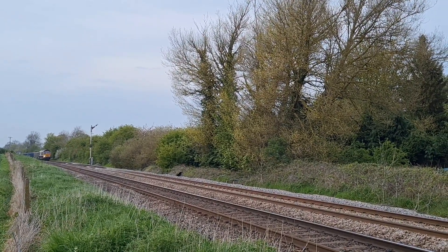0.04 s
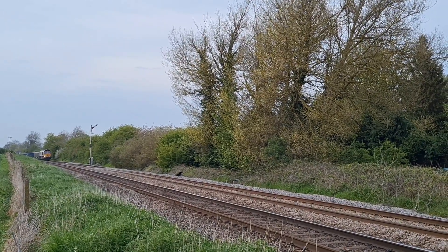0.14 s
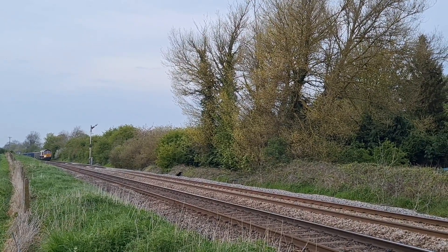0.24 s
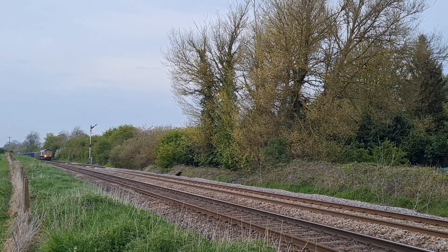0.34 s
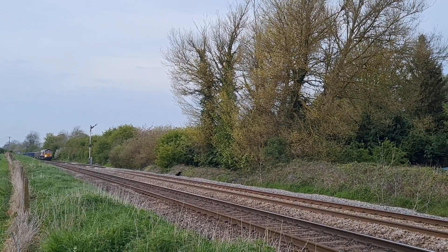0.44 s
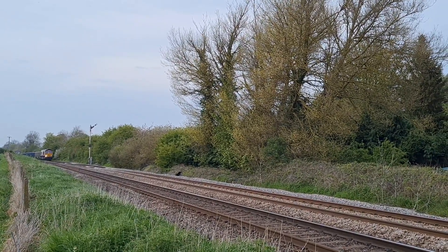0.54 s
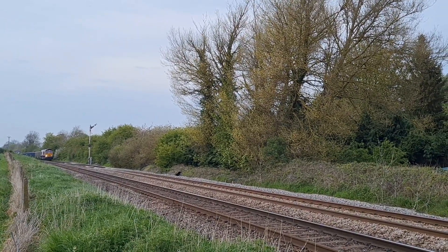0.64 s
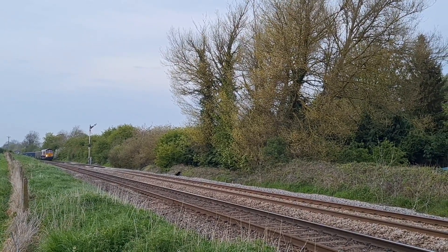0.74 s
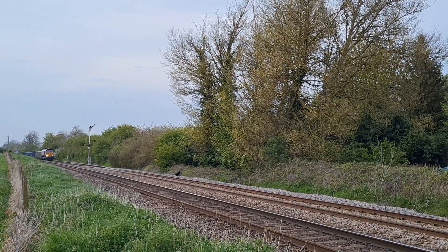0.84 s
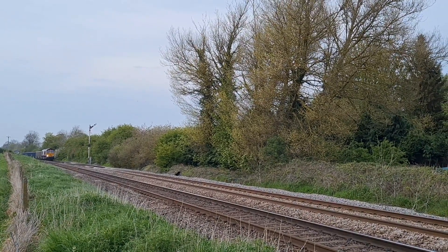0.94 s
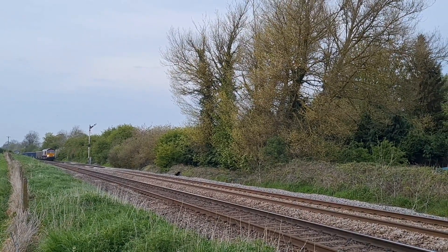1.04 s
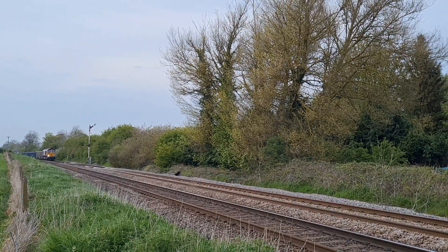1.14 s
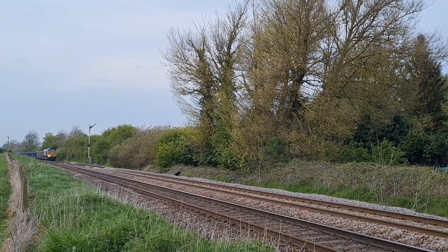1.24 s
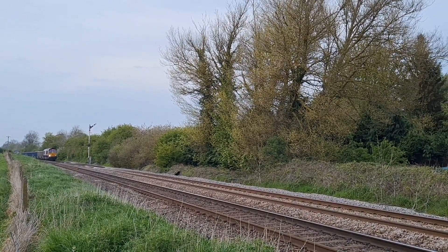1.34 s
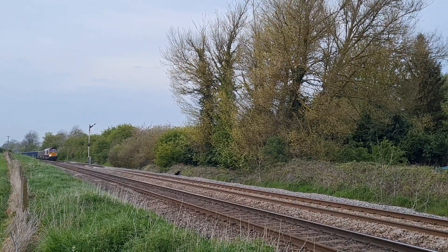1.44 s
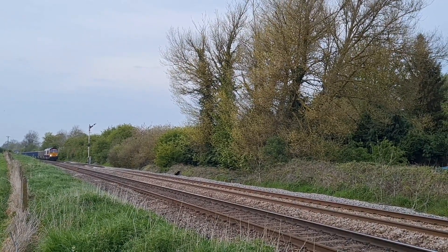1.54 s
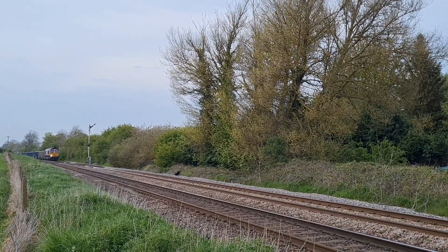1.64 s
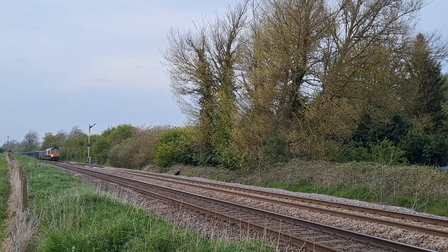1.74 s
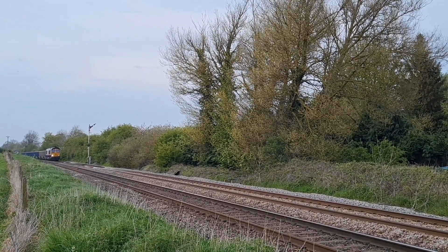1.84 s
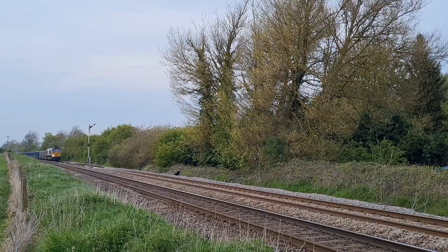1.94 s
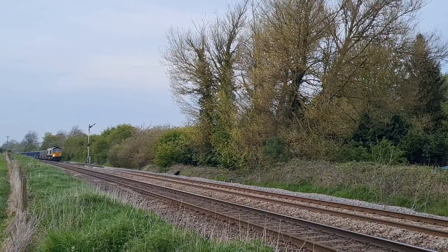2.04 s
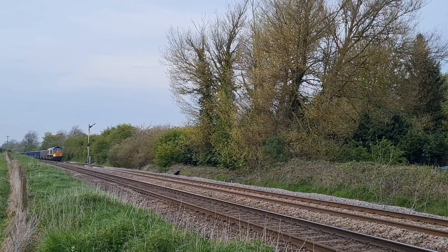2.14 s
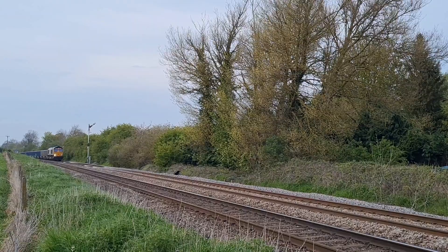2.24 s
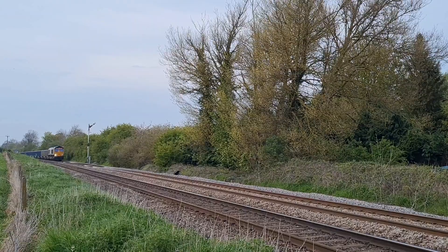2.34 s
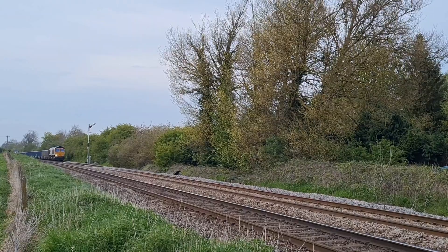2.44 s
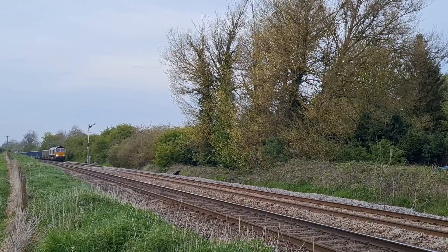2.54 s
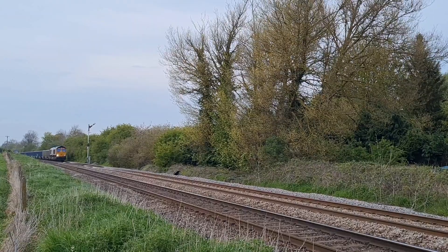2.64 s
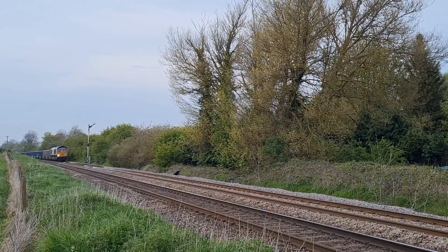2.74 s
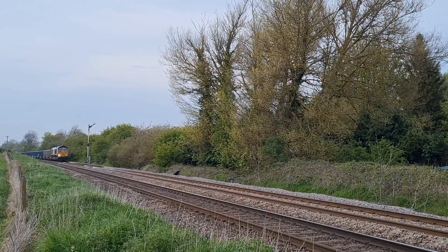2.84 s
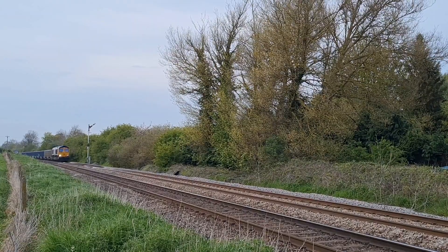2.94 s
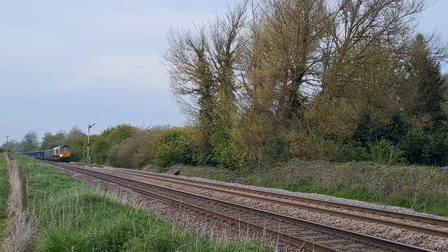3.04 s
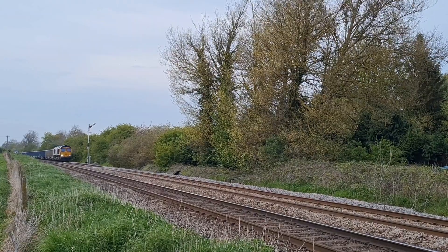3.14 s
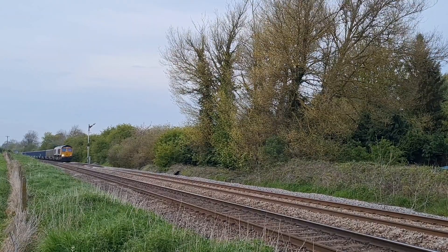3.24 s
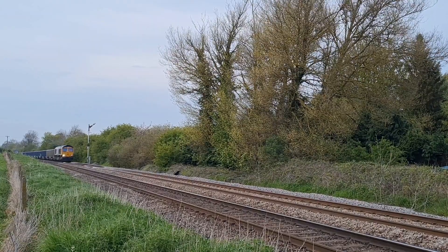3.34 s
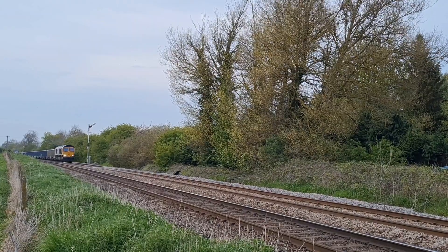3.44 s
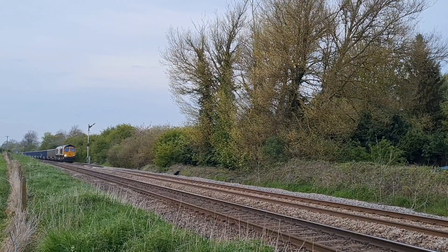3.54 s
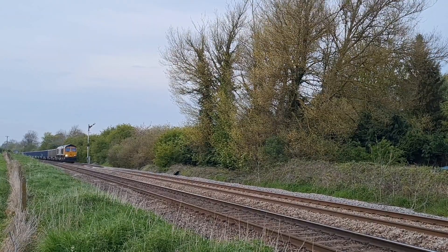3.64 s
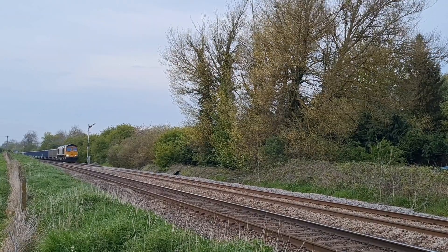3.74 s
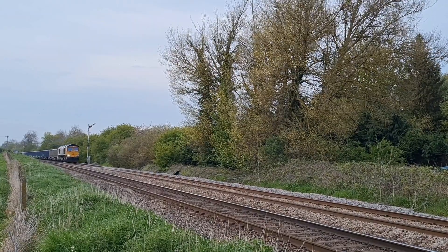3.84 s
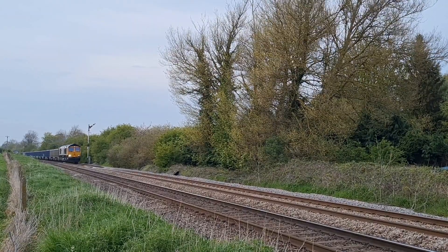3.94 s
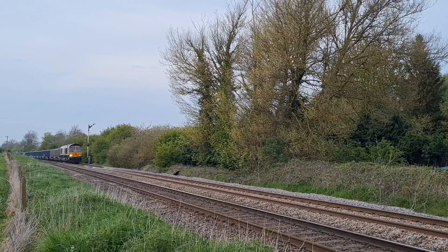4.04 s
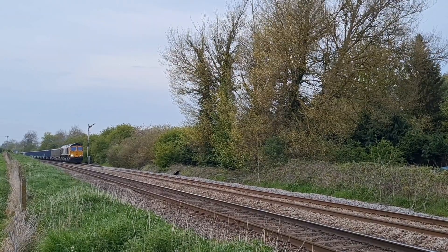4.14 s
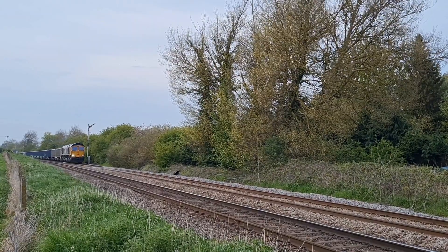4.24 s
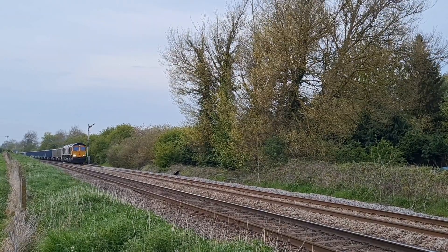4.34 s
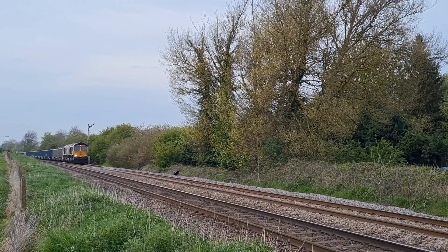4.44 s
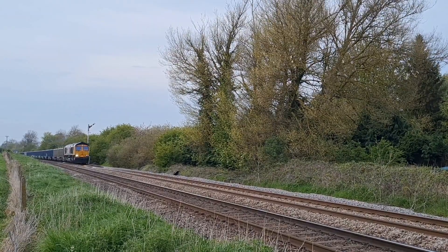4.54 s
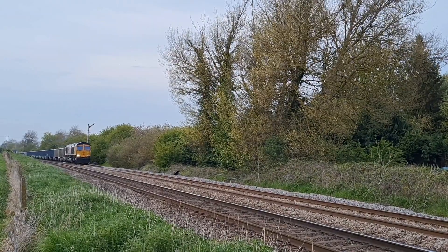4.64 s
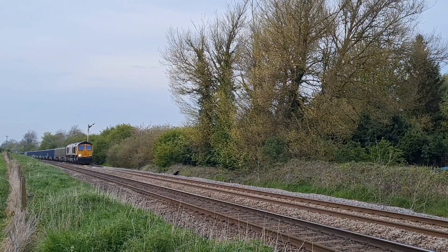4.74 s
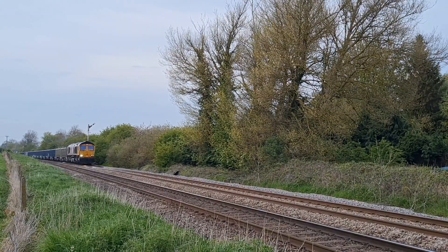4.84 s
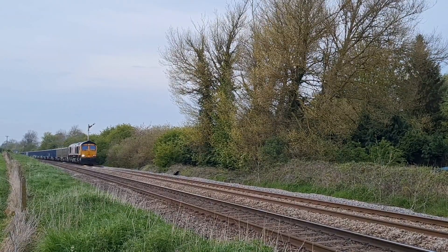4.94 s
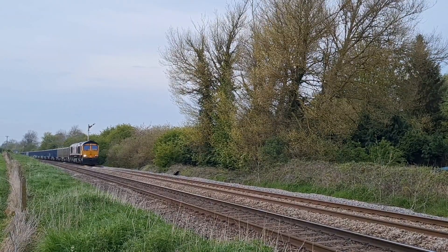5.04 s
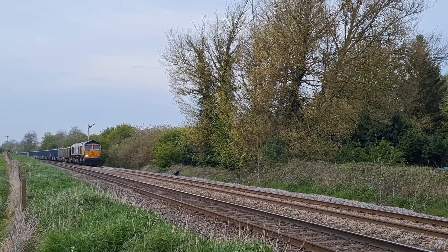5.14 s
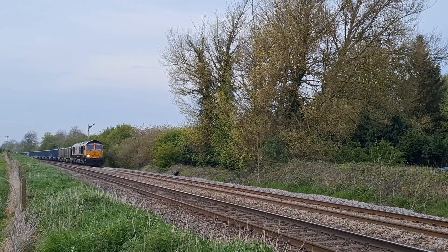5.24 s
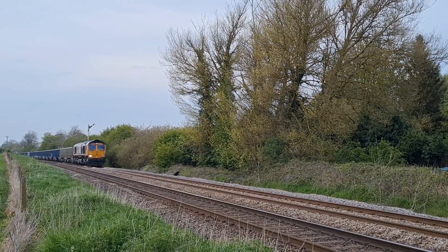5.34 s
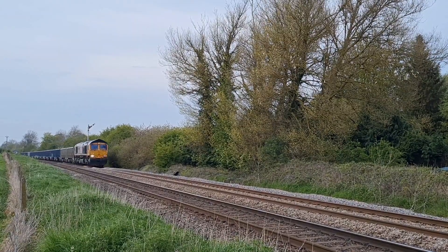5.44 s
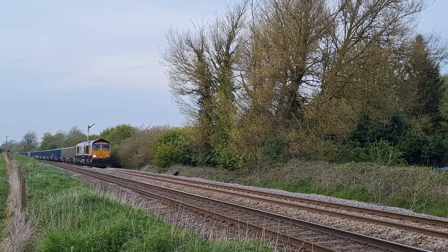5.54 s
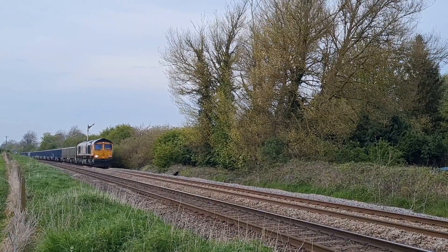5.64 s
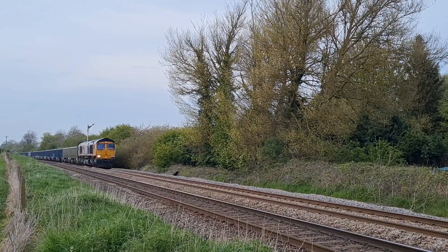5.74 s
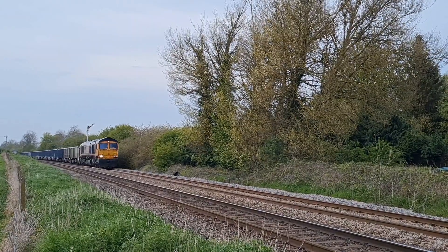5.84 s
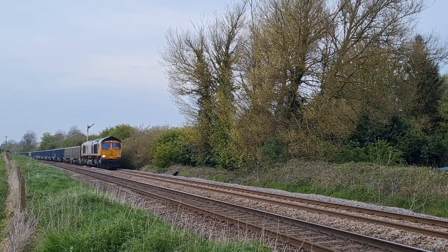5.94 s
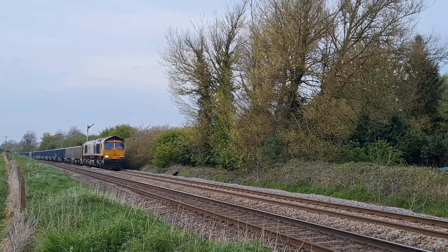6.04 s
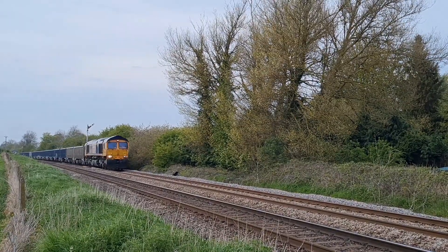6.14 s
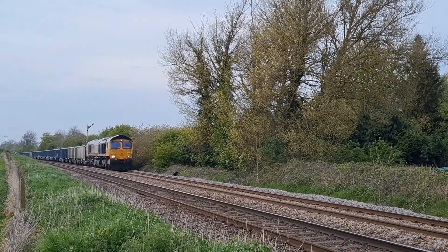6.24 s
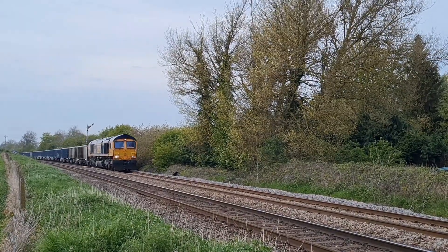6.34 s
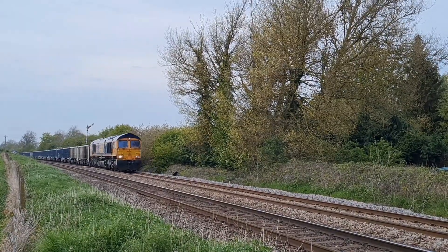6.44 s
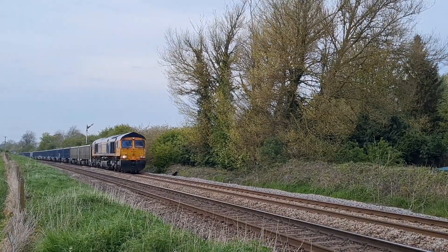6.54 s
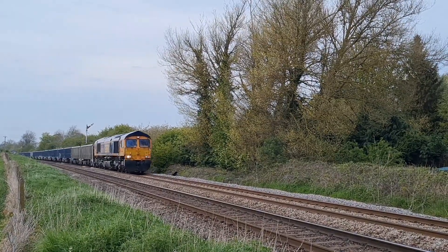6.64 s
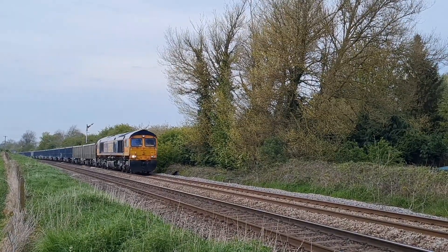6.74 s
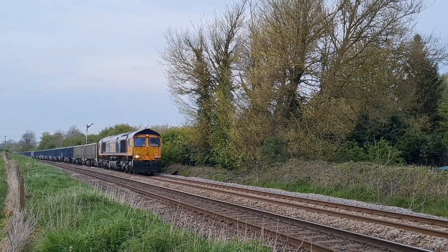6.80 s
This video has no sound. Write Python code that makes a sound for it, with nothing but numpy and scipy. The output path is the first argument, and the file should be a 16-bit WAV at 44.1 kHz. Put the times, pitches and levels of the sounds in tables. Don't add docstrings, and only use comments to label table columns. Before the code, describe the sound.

Low engine rumble and rolling steel grow steadily nearer across open country until a locomotive's air horn barks twice, brassy and close in pitch.

```python
import sys
import numpy as np
from scipy import signal
from scipy.io import wavfile
from scipy.ndimage import uniform_filter1d, minimum_filter1d

SR = 44100
rng = np.random.default_rng(int(sys.argv[2]) if len(sys.argv) > 2 else 0)


def put_to_file(sound):
    columns = np.atleast_2d(sound).T
    safe = np.clip(columns, -1, 1)
    whole_steps = np.round(safe * 32767)
    wavfile.write(sys.argv[1], SR, whole_steps.astype(np.int16))


def attenuation_scalar(level_db):
    decades = np.asarray(level_db, float) / 20
    return 10 ** decades


N = 302967


def read(points, hz):
    f, value = np.transpose(points)
    return np.interp(np.log(hz + 1), np.log(f + 1), value)


def evened(x):
    return x / np.sqrt(np.mean(abs(x) ** 2) + 1e-20)


def drift(rate_hz, n):
    t = np.arange(0, n + 256, 256) / SR
    f = np.geomspace(rate_hz / 12, rate_hz, 16)[:, None]
    sines = np.sin(2 * np.pi * (f * t + rng.random(f.shape)))
    slow = (sines / np.sqrt(f)).sum(0)
    return np.interp(np.arange(n) / SR, t, evened(slow))


# f/Hz, left minus right level/dB
PORT_LEAN = [(60, -2), (220, -1), (380, -5), (520, 2.7), (900, -2), (1450, 4), (1800, 1), (2200, 5.74),
             (3400, -6), (3800, -1), (4800, -12), (7000, 1), (9500, 3), (10500, 18), (13500, 9),
             (14800, 18)]
# f/Hz, left lead/rad
PORT_LEAD = [(30, .45), (330, 0), (500, -.4), (800, -.7), (1550, -4), (1980, -3.5), (2410, 1.4), (2930, 2),
             (3450, 7.3), (3900, 7.7), (4600, 9.5), (5300, 7), (6500, 15), (14600, 30)]


def ports(hz):
    half = attenuation_scalar(read(PORT_LEAN, hz) / 2) * np.exp(.5j * read(PORT_LEAD, hz))
    return np.array([half, 1 / half])


# f/Hz, likeness/0-1
PORT_LIKENESS = [(60, .99), (300, .93), (470, .3), (650, .88), (1000, .6), (1500, .85), (4200, .85),
                 (4700, .4), (5500, .6), (8000, .3), (14000, .2)]


def noise(shape_db, size, patchy_db, gust_db, count=N):
    frames, hz = 2 * count // size + 3, np.fft.rfftfreq(size, 1 / SR)
    a, b, c, d, patches = rng.standard_normal((frames, len(hz), 5), np.float32).T
    patches = evened(uniform_filter1d(uniform_filter1d(patches, 8, 0), 6, 1))
    gusts = evened(uniform_filter1d(rng.standard_normal(frames), 6))
    same = np.clip(read(PORT_LIKENESS, hz), 0, 1)[:, None]
    left = a + 1j * b
    right = same * left + np.sqrt(1 - same ** 2) * (c + 1j * d)
    z = np.array([left, right]) * ports(hz)[:, :, None]
    z *= attenuation_scalar(shape_db(hz)[:, None] + patchy_db * patches + gust_db * gusts)
    out = signal.istft(z, window="cosine", nperseg=size, noverlap=size // 2)[1][:, :count]
    return out / np.sqrt(np.mean(out.mean(0) ** 2))


def orders(hz, table, waver_db, slip):
    t, out = np.arange(N) / SR, np.zeros((2, N))
    for k, db in table:
        turn = 2 * np.pi * (k * hz * t + rng.random()) + slip * drift(5., N)
        line = np.sqrt(2) * attenuation_scalar(db + waver_db * drift(6., N)) * np.exp(1j * turn)
        out += (ports(k * hz)[:, None] * line).real
    return out


# f/Hz, level/dB per Hz
FIELD_WASH = [(90, -27), (150, -14.5), (260, 1.5), (330, -6), (520, -14.5), (900, -16), (1500, -49)]


def field():
    return attenuation_scalar(-55) * noise(lambda hz: read(FIELD_WASH, hz), size=1024, patchy_db=-1.0, gust_db=2.0)


# f/Hz, level/dB per Hz
SIZZLE = [(5000, -25), (6300, 5), (7300, 1.5), (7800, -8.5), (8200, -25.5), (8700, -12), (9800, -5.5),
          (10200, -8), (11900, -4.5), (13000, -6.5), (14100, -5), (14800, -10), (15200, -37)]


def sizzle():
    return attenuation_scalar(2.0) * noise(lambda hz: read(SIZZLE, hz), size=512, patchy_db=1.1, gust_db=0.0)


# f/Hz, level/dB per Hz
TRAIN_HISS = [(800, -15.5), (1250, -3), (1500, -1), (1650, 0.5), (1900, 0.5), (2150, -5), (2400, -5),
              (2650, -6.5), (3000, -5), (3400, -10), (3620, -13.5), (4300, -11.5), (5900, -19.5),
              (7500, -33), (8200, -58)]


def hiss():
    return attenuation_scalar(1.0) * noise(lambda hz: read(TRAIN_HISS, hz), size=512, patchy_db=0.82, gust_db=0.48)


# f/Hz, width/Hz, level/dB over the roar
WHEEL_RINGS = [(365.4, 13, -20.5), (689, 59, -17), (735, 9.2, -6), (843.6, 54, -5)]


def wheel_rings(hz):
    peaks = 0
    for f, width, db in WHEEL_RINGS:
        peaks = peaks + attenuation_scalar(2 * db) / width / (1 + (2 * (hz - f) / width) ** 2) ** 2
    return 10 * np.log10(peaks)


# f/Hz, level/dB per Hz
RAIL_ROAR = [(100, -51), (170, -14.5), (216, -17.5), (276, -8), (312, -12.5), (373, -2), (437, -38),
             (490, -29), (564, -11), (762, 0), (925, -9.5), (1130, -5.5), (1400, -16), (1820, -33),
             (3080, -120)]
# multiple, level/dB over the roar
GENERATOR = [(2, -16.5), (3, -21), (4, -15.5), (5, -27.5), (6, -22), (8, -9.5), (12, -10)]
HUM_HZ = 95.24


def rolling():
    out = attenuation_scalar(-1.5) * noise(lambda hz: read(RAIL_ROAR, hz), size=1024, patchy_db=1.2, gust_db=.3)
    out += orders(HUM_HZ, GENERATOR, waver_db=3.0, slip=0.41)
    return out + attenuation_scalar(-7.5) * noise(wheel_rings, size=8192, patchy_db=3, gust_db=.6)


# multiple, level/dB over the exhaust
CRANK_ORDERS = [(3, -16), (4, -13.5), (5, -9.5), (6, -13.5), (7, -20), (8, -23), (9, -24.5), (10, -29),
                (14, -42.5), (20, -40.5)]
CRANK_HZ = 16.13


def crank():
    return orders(CRANK_HZ, CRANK_ORDERS, waver_db=3.0, slip=0.85)


def boom(hz, width_hz):
    turn = np.exp(2j * np.pi * np.cumsum(hz) / SR)
    r = np.exp(-np.pi * width_hz / SR)
    slow = signal.lfilter([1], [1, -2 * r, r * r], rng.standard_normal((N, 2)) @ [1, 1j])
    steady = slow / (abs(evened(slow)) + .05) ** .6
    return (ports(55.)[:, None] * np.sqrt(2) * evened(steady) * turn).real


# f/Hz, level/dB per Hz
EXHAUST = [(12, -50), (22, -16), (35, -11), (48, 1.5), (65, -1.5), (90, -26.5), (120, -20.5), (170, -42.5),
           (260, -34), (400, -91)]
BOOM_MID_HZ, BOOM_WANDER_HZ = 55.5, 3.1


def throb():
    rough = attenuation_scalar(-4.2) * noise(lambda hz: read(EXHAUST, hz), size=4096, patchy_db=-1.0, gust_db=0.9)
    return rough + attenuation_scalar(-3.5) * boom(BOOM_MID_HZ + BOOM_WANDER_HZ * drift(4., N), 7.4)


# level/dB at 100 m, loss/dB per 100 m, level/dB hidden by the bushes, share of the uneven
TRAIN_LAYERS = [
    (-28, 1.3, 0.1, 1, 0.05),
    (-27, 5.3, 1.1, .1, 0.05),
    (-39.6, 6.6, -.5, 0.05, 1),
    (-49, 1.3, -6, 0.05, .4),
    (-63.3, 6.8, -5.5, 0.05, .05),
]
# t/s, engine level/dB, rail level/dB, clear-air level/dB on the hiss
UNEVEN_LEVELS = [(0, 2.1, .6, .6), (.45, -2.6, 1.5, -1.4), (.9, .3, -1.3, .3), (1.35, 7.1, -.6, 1.1),
                 (1.75, -4.5, .1, .9), (2.1, 1.6, -1.1, .6), (2.5, -.6, -2.1, -.3), (2.9, .1, 2.6, .6),
                 (3.35, -1.6, .1, .3), (3.7, -.6, 2.3, -.6), (4.1, 3.1, .1, -.9), (4.4, 3.9, .3, -.3),
                 (4.7, -1.8, 1.8, -.4), (5.2, .8, -.6, .1), (5.6, 1.3, .6, -.7), (6, -.9, .6, .9),
                 (6.4, -.1, -1.9, 2.2)]
SPEED_M_S, ARRIVES_S = 25, 9.1
SCREEN_S = .9
THROB_SWING_DB = 1.2


def train(duck_db):
    t = np.arange(N) / SR
    s, *uneven = np.transpose(UNEVEN_LEVELS)
    engine_db, rail_db, clear_db = (np.interp(t, s, db) for db in uneven)
    far = SPEED_M_S * (ARRIVES_S - t) / 100
    levels = []
    for db, loss, hidden, engine, rail in TRAIN_LAYERS:
        nearing = db - 20 * np.log10(far) - loss * (far - 1)
        screen = hidden * np.exp(-t / SCREEN_S)
        levels.append(nearing + screen + engine * engine_db + rail * rail_db)
    exhaust_db, crank_db, roar_db, hiss_db, sizzle_db = levels
    exhaust_db = exhaust_db + THROB_SWING_DB * drift(8., N)
    out = field()
    out += attenuation_scalar(sizzle_db - .15 * duck_db) * sizzle()
    out += attenuation_scalar(hiss_db + clear_db - 0.1 * duck_db) * hiss()
    out += attenuation_scalar(roar_db - 0.38 * duck_db) * rolling()
    out += attenuation_scalar(crank_db - 0.66 * duck_db) * crank()
    return out + attenuation_scalar(exhaust_db - .5 * duck_db) * throb()


def trees(x, t60, wet_db):
    at = np.arange(900, 16000, 40) + rng.integers(0, 40, (2, 378))
    taps = np.zeros((2, 16100))
    np.put_along_axis(taps, at, rng.choice([-1., 1.], at.shape) * attenuation_scalar(-60 * at / SR / t60), 1)
    taps = signal.lfilter([1], [1, -.75], taps)
    echoes = signal.fftconvolve(x, taps / np.linalg.norm(taps[0]), axes=1)[:, :x.shape[1]]
    return x + attenuation_scalar(wet_db) * echoes


# start t/s, sharp start f/Hz, half-line level/dB, spit of air level/dB, ripening t/s
HORN_BLASTS = [
    (6.385, 21, -5, 12, .14),
    (6.686, 2.6, -12, .3, .06),
]
# t/s, air pressure level/dB, 2nd partial plus its echo/signed amplitude
PRESSURE = [
    [(6.385, -35, 0), (6.403, -24, .015), (6.42, -11, .17), (6.447, -.6, .06), (6.48, -.3, .085),
     (6.535, .6, -.25), (6.56, -2.5, -.09), (6.577, -7, -.17), (6.605, -20, -.03)],
    [(6.65, -33, .08), (6.686, -32, .036), (6.704, -12, .05), (6.728, -4, .085), (6.765, -2.5, .23),
     (6.797, -2.5, .27), (6.84, -.3, -.18), (6.86, -.6, -.31), (6.87, -1.5, -.3)],
]
NOTE_HZ, SETTLE_S, SAG_HZ_PER_S = 397.3, .025, 8
SPIT_AT_S, SPIT_S = .04, .013
FIRST_DB, FIRST_SHARE = -30, .15
FIRST_BEAT_DB, FIRST_BEAT_HZ, FIRST_DIP_S = 1.5, 11.7, 6.527
MIDDLE_DB, UPPER_DB, UPPER_SHARE = -19.6, -21.3, .85
TIRE_S, TIRE_DB, LATE_S, LATE_DB = .18, -8, .03, -11
HALF_SHARE, HALF_GROW_DB = .6, 8
DULL_DB, RIPE_DB = -3.3, .8
AIR_DB, AIR_SHARE, AIR_RIPE_DB, AIR_RIPEN_S = -46, .55, 12.5, .14


def valve(t):
    s, pressure, second = np.vstack(PRESSURE).T
    pressure, rows = np.interp(t, s, pressure), np.array(HORN_BLASTS)
    blast = np.maximum(np.searchsorted(rows[:, 0], t) - 1, 0)
    start, sharp_hz, half_db, spit_db, ripen_s = rows[blast].T
    age = t - start
    spit = np.exp(-((age - SPIT_AT_S) / SPIT_S) ** 2)
    ripe = np.clip(age / ripen_s, 0, 1) ** 2
    hz = NOTE_HZ + sharp_hz * np.exp(-age / SETTLE_S) - SAG_HZ_PER_S * age

    first = FIRST_DB + FIRST_SHARE * pressure
    first -= FIRST_BEAT_DB * np.cos(2 * np.pi * FIRST_BEAT_HZ * (t - FIRST_DIP_S))
    first += .6 * spit_db * np.exp(-((age - .05) / .04) ** 2)
    first -= .75 * half_db
    upper = UPPER_DB + UPPER_SHARE * pressure
    upper += TIRE_DB * np.clip(age / TIRE_S, 0, 1) ** 2 + LATE_DB * np.exp(-age / LATE_S)
    bright = DULL_DB + (RIPE_DB - DULL_DB) * ripe + .3 * spit_db * spit
    strain = np.clip(age / AIR_RIPEN_S, 0, 1) ** 2
    air = AIR_DB + AIR_SHARE * pressure + AIR_RIPE_DB * strain + 1.25 * spit_db * spit
    half = half_db + HALF_GROW_DB * (strain - .55) + HALF_SHARE * pressure
    levels = first, MIDDLE_DB + pressure, upper, half, bright, air
    return hz, np.interp(t, s, second), [uniform_filter1d(db, 200) for db in levels]


# multiple, left level/dB, right level/dB, left lead/rad
HORN_STACK = [(1, -11, -5.5, 1.2), (2, -2.8, 1.8, 0.45), (3, 2, -1.3, 1.2), (4, -1, -8, 1.8),
              (5, -5.5, -13, 3.2), (6, -7.5, -17, 1.1), (7, -9.5, -17.5, 1.8), (8, -15, -6, -2.7),
              (9, -30.5, -20, 8.2), (10, -28, -19, 1.5), (11, -33, -16.5, -2.8), (12, -30, -21, -0.9),
              (13, -28, -26, -1.1), (14, -27.8, -26, -.4), (15, -32, -42, 0.5), (16, -32.5, -37.5, .8),
              (17, -38, -40, .7), (18, -40, -48, -.2), (19, -42, -50, 3.7), (20, -46, -59, -3.7),
              (21, -49, -61, 4.3), (23, -54, -56, -3)]
# multiple, left level/dB, right level/dB, left lead/rad
HALF_LINES = [(4.5, -14, -21, 1.8), (5.5, -13, -44, 2), (6.5, -19, -35, -1), (8.5, -29, -26, .2),
              (10.5, -39, -22, 2.8), (12.5, -37, -39, -.8), (13.5, -39, -38, 8), (14.5, -37, -36, -4)]
# f/Hz, level/dB per Hz
HORN_BREATH = [(200, -34), (800, 1.5), (3000, -3), (4000, -14), (6300, -9.5), (8000, -32), (9500, -41),
               (11000, -34), (14500, -26), (16000, -77)]
# f/Hz, level/dB per Hz
HORN_RASP = [(8000, -60), (9800, -27), (10400, -9), (11500, -1), (12500, -6), (13500, 3.5), (14500, -4),
             (15200, -37)]


def horn():
    t = np.arange(round(HORN_BLASTS[0][0] * SR), N) / SR
    n = len(t)
    hz, second, (first, middle, upper, half, bright, air) = valve(t)
    beat = uniform_filter1d(second, 400)
    turns = np.cumsum(hz) / SR
    note = np.zeros((2, n))
    for k, left_db, right_db, lead in HORN_STACK + HALF_LINES:
        if k < 2:
            db = first + 10.5
        elif k < 3:
            db = 4.5
        elif k <= 4:
            db = middle + 6.5
        else:
            db = upper + 12.4
        if k % 1:
            db = db + half
        db = db + bright * np.clip(k - 7, 0, 6) + np.array([[left_db], [right_db]])
        waver = np.array([drift(22., n) for _ in range(4)]) * np.clip(k - 2, .5, 6) / 6
        sag = 2 * np.pi * 3.5 * t * (k == 2)
        phase = 2 * np.pi * k * turns + 0.75 * k - sag + np.array([[lead], [0]])
        phase = phase + 0.47 * waver[2] + 0.2 * waver[3] * [[1], [-1]]
        wave = attenuation_scalar(db + 2.1 * waver[:2]) * np.cos(phase)
        note += wave * beat if k == 2 else wave
    puffs = 0.65 + np.exp(-(turns % 1) / .3)
    breath = noise(lambda hz: read(HORN_BREATH, hz), size=256, patchy_db=1.5, gust_db=.5, count=n)
    rasp = noise(lambda hz: read(HORN_RASP, hz), size=256, patchy_db=2.0, gust_db=-4.5, count=n)
    note += puffs * attenuation_scalar(air) * breath
    note += puffs * attenuation_scalar(upper + 3.5 * bright - 30) * rasp
    note *= np.minimum((t - t[0]) / 0.025, 1)
    note = trees(note, t60=.45, wet_db=-20.5)
    return np.pad(note, ((0, 0), (N - n, 0)))


def scene():
    blast = horn()
    power_db = 10 * np.log10(abs(uniform_filter1d((blast ** 2).mean(0), 500)) + 1e-12)
    fall = np.arange(N) * 30.0 / SR
    held_db = np.maximum.accumulate(power_db + fall) - fall
    over_db = np.maximum(held_db + 24, 0)
    return train(uniform_filter1d(over_db, 300)) + blast


def band_limit(x):
    return signal.sosfilt(signal.butter(12, 15030, fs=SR, output="sos"), x)


def record(dry):
    room = minimum_filter1d(np.minimum(.93 / (abs(dry).max(0) + 1e-9), 1), 401)
    mix = dry * uniform_filter1d(room, 401)
    return band_limit(mix)


dry = scene()
out = record(dry)
put_to_file(out)
```